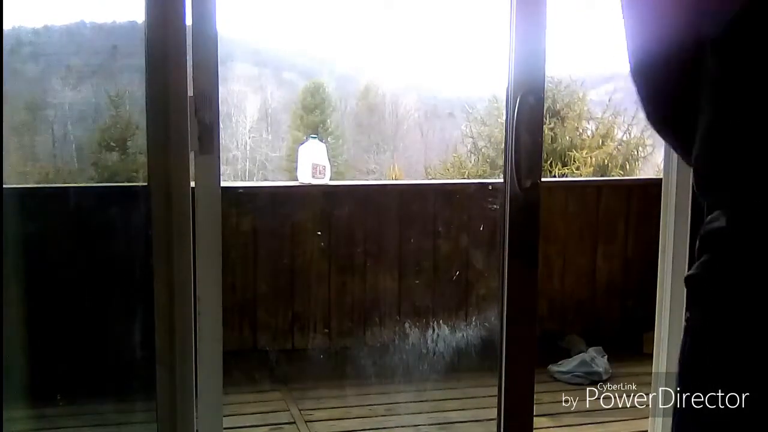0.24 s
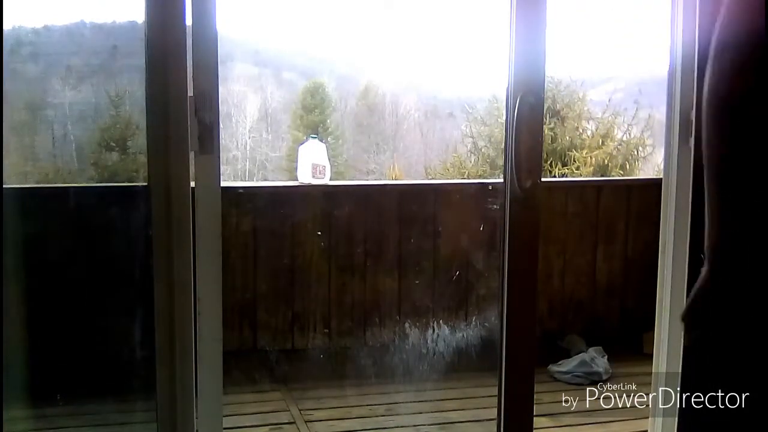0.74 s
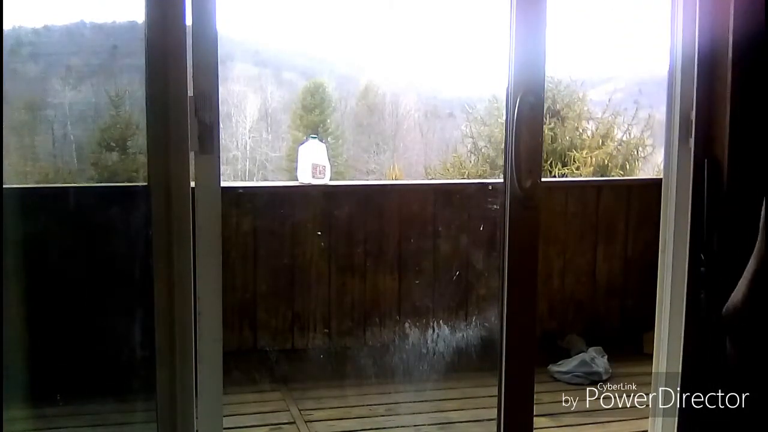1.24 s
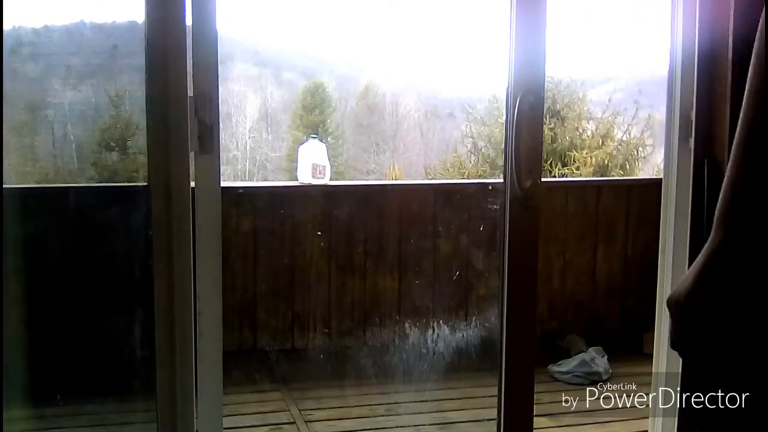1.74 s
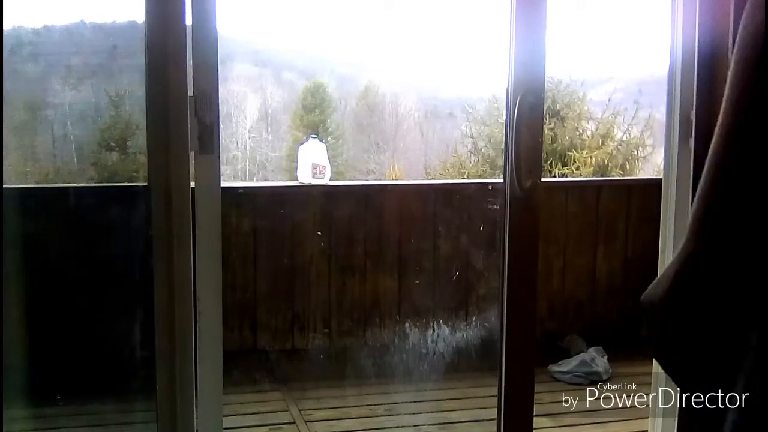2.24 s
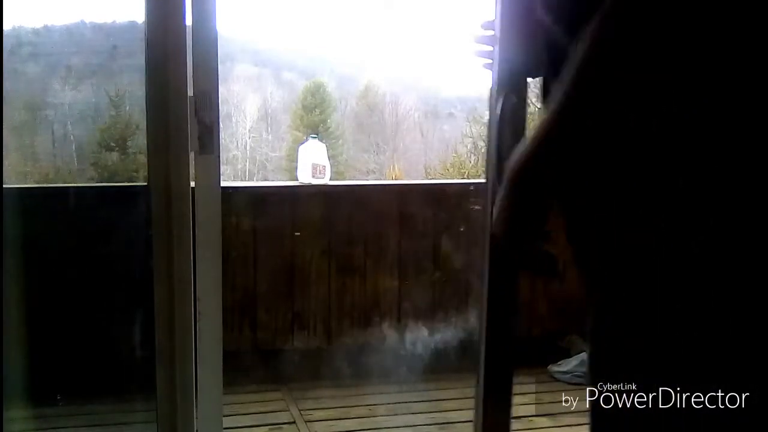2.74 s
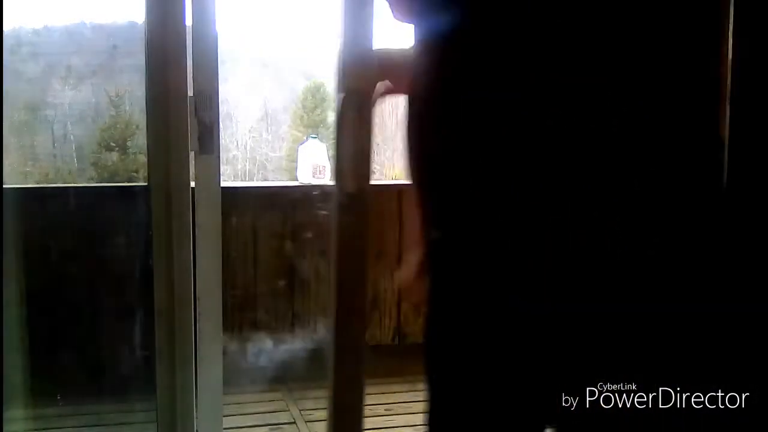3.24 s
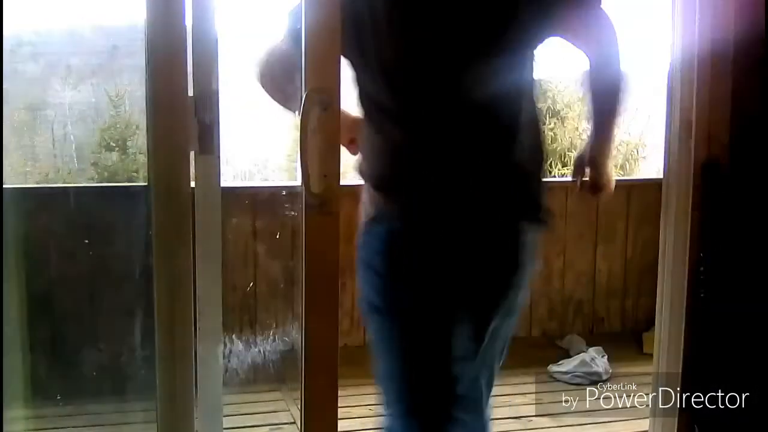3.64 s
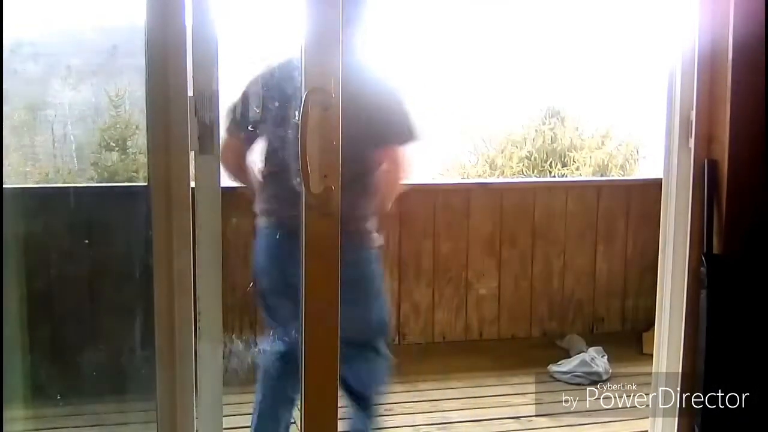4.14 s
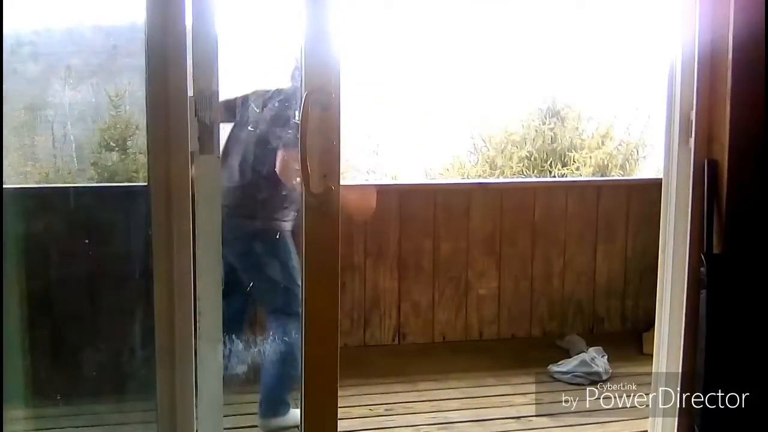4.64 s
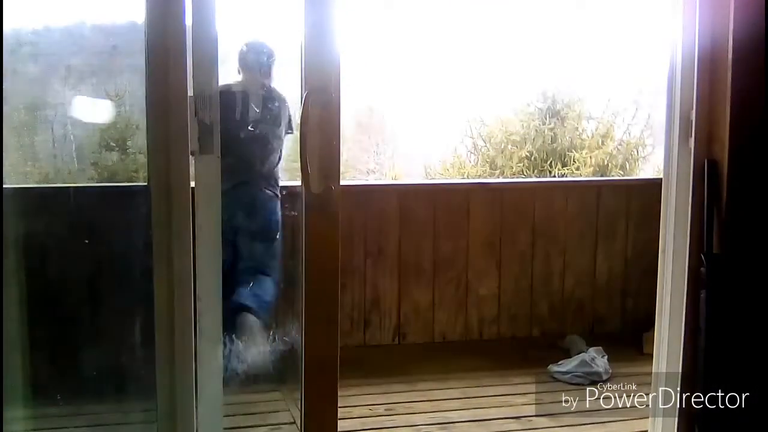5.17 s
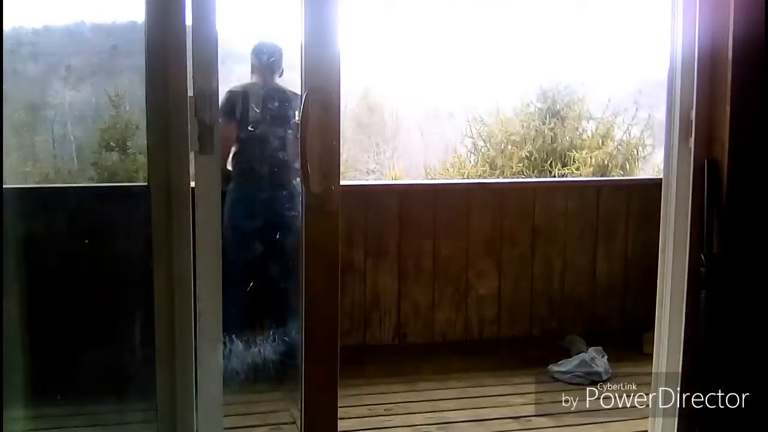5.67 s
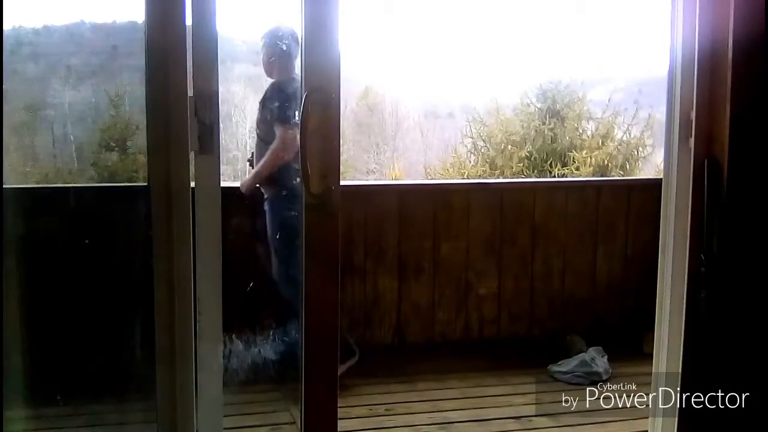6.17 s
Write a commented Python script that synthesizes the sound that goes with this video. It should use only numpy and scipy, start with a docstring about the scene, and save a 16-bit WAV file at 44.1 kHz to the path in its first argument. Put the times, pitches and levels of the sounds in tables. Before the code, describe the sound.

In a quiet wooden room with hum, hiss and a tiny tick each second, soles scuff and a heel booms close by. A board creaks, a glass sliding door snaps off its latch and rumbles open. Softer steps cross the deck outside with cloth rustle and faint squeaks, then one loud knock clatters and rings in the room. The microphone stays indoors.

```python
"""A low hum, hiss and thin whine are heard first, with a small tick of damped sines once a second.
Soles shuffle over a wooden floor (filtered random slips), boards groan and creak, a heel booms (clicks, modes).
A glass sliding door snaps off its latch and rolls open: friction noises that grow with its speed.
Softer steps thud on the deck outside amid cloth rustle and faint squeaks (noise-driven resonances).
Then one loud wooden knock clatters and rings: clicks through a wood colour and a room, plus damped modes."""
import sys
import numpy as np
from scipy import signal
from scipy.io import wavfile
from scipy.ndimage import uniform_filter1d

SR = 44100
rng = np.random.default_rng(int(sys.argv[2]) if len(sys.argv) > 2 else 0)


def unload_wav(signal):
    """Save mono or channel-first audio to the path in sys.argv[1] as 16-bit WAV at rate SR, clipped to [-1, 1]."""
    wavfile.write(
        sys.argv[1],
        SR,
        np.round(np.clip(np.atleast_2d(signal).T, -1, 1) * 32767).astype(np.int16),
    )


N = 282703
TIME = np.arange(N) / SR


def amp(db):
    """Decibels to gain."""
    return 10 ** (np.asarray(db) / 20)


def evened(x):
    """Scale to rms 1."""
    return x / np.sqrt(np.mean(x ** 2) + 1e-20)


def read(points, hz):
    """Straight lines between points on a log-frequency axis."""
    point_hz, value = np.transpose(points)
    return np.interp(np.log(hz + 1), np.log(point_hz + 1), value)


def add(mix, start_s, sound):
    """Mix a sound in at start_s, cut at the end of the mix."""
    part = mix[max(round(start_s * SR), 0):][:len(sound)]
    part += sound[:len(part)]


def envelope(start_s, length_s, attack_s, fade_db_per_s, arch_db=0):
    """Attack, hold and release; the ends of the hold lie arch_db under its middle."""
    t = TIME - start_s
    arch = (2 * np.clip(t / length_s, 0, 1) - 1) ** 2
    fade_db = fade_db_per_s * np.maximum(t - length_s, 0)
    return np.clip(t / attack_s, 0, 1) * amp(-arch_db * arch - fade_db)


def coloured(x, spectrum, size=4096):
    """Minimum-phase filter of unit energy with the given spectrum."""
    hz = abs(np.fft.fftfreq(size, 1 / SR))
    log_gain = np.log(amp(read(spectrum, hz)))
    response = np.exp(np.conj(signal.hilbert(log_gain)))
    taps = np.fft.ifft(response).real[:size // 2]
    return signal.oaconvolve(x, taps / np.linalg.norm(taps))[:len(x)]


# room decay before the ring factor: hz, t60_s
ROOM_DECAY = [(60, 0.29), (200, 0.46), (500, 0.53), (1500, 0.55), (3500, 0.46), (6000, 0.34), (11000, 0.44)]


def room(wet_db, ring=1, size=32768):
    """Direct click plus dense reflections, each band dying at its own speed; unit energy."""
    clicks = rng.choice([-1., 1.], size)
    hz, t, bands = signal.stft(clicks, SR, nperseg=256)
    t60_s = ring * read(ROOM_DECAY, hz)[:, None]
    tail = signal.istft(bands * amp(-60 * t / t60_s), SR, nperseg=256)[1][:size]
    tail *= 1 - np.exp(-TIME[:size] / 0.00041)  # onset, s
    response = amp(wet_db) * tail / np.linalg.norm(tail)
    response[0] += 1
    return response / np.linalg.norm(response)


def ringing(modes, size=32768):
    """Sum of exponentially damped sines."""
    t = TIME[:size]
    return sum(amp(db - 60 * t / t60_s) * np.sin(2 * np.pi * hz * t) for hz, db, t60_s in modes)


def wavering(hz, width_hz):
    """Noise-driven resonance around a pitch; rms 1."""
    lowpass = signal.butter(2, width_hz / 2, fs=SR, output="sos")
    noise = rng.standard_normal(N) + 1j * rng.standard_normal(N)
    drift = signal.sosfilt(lowpass, noise)
    carrier = np.exp(2j * np.pi * np.cumsum(hz * np.ones(N)) / SR)
    return evened((drift * carrier).real)


def singing(hz, waver):
    """Steady tone whose pitch trembles by waver (rms share of hz); rms 1."""
    tremble = evened(uniform_filter1d(rng.standard_normal(N), size=400))
    phase = 2 * np.pi * np.cumsum(hz * (1 + waver * tremble)) / SR
    return np.sqrt(2) * np.sin(phase)


def blows(rows, spectrum, wet_db, ring=1):
    """Clicks through the object's colour and the room; level = energy over 10 ms."""
    out = np.zeros(N)
    for start_s, db in rows:
        add(out, start_s, amp(db) * np.sqrt(SR / 100) * room(wet_db, ring))
    return coloured(out, spectrum)


def body(rows, modes, gain_db):
    """Damped modes that each blow sets ringing."""
    out, ring = np.zeros(N), ringing(modes)
    for start_s, db in rows:
        add(out, start_s, amp(db + gain_db) * ring)
    return out


def friction(spectrum, per_s, spread_db, wet_db, count=3):
    """Random tiny slips, coloured by the surface; reflections shift as the source moves; rms 1."""
    sizes = amp(spread_db * np.minimum(rng.exponential(1, N), 4))
    slips = (rng.random(N) < per_s / SR) * rng.choice([-1., 1.], N) * sizes
    heard = np.zeros(N)
    for k in range(count):
        place = np.maximum(np.cos(2 * np.pi * (2.5 * TIME + k / count)), 0)  # 2.5 rounds per s
        heard += signal.oaconvolve(slips * place, room(wet_db, ring=0.95))[:N]
    return evened(coloured(heard, spectrum))


# hiss colour: hz, rel_db_per_hz
HISS_COLOUR = [(20, -29), (55, -5.5), (90, -7.5), (150, -2.5), (300, -8.5), (650, -15.5), (1450, -20.5),
               (2200, -24), (6700, -26.5), (7900, -38.5), (11500, -39), (13800, -34), (14700, -29),
               (16000, -26)]
# hum resonances: hz, width_hz, level_db
HUM_BANDS = [(117, 8.8, -69.5), (231.6, 10.4, -70.5), (277, 31, -73), (361, 12.6, -75), (469, 14, -75),
             (1476, 28, -79.5)]
HISS_DB, WHINE_DB, WHINE_HZ = -59.5, -68, 12695


def background():
    """Room hum from narrow resonances, microphone hiss from shaped noise, electronic whine from a sine."""
    hiss = amp(HISS_DB) * evened(coloured(rng.standard_normal(N), HISS_COLOUR))
    hum = sum(amp(db) * wavering(hz, width_hz) for hz, width_hz, db in HUM_BANDS)
    whine = amp(WHINE_DB) * np.sin(2 * np.pi * WHINE_HZ * TIME)
    return hiss + hum + whine


# damped parts of one tick: delay_s, hz, level_db, t60_s
TICK_PARTS = [(0, 280, -38, .024), (.002, 750, -46, .014), (.002, 1480, -55, .02), (.01, 120, -41, .055),
              (.01, 450, -50, .012), (.0045, 3000, -56, .035), (.001, 2450, -56, .015)]
TICK_START_S, TICK_PERIOD_S = .0645, 1.0


def ticking():
    """A small mechanism beside the microphone: short damped sines, dry, once a second."""
    out = np.zeros(N)
    for start_s in np.arange(TICK_START_S, TIME[-1], TICK_PERIOD_S):
        for delay_s, hz, db, t60_s in TICK_PARTS:
            add(out, start_s + delay_s, ringing([(hz, db, t60_s)]))
    return out


# faint squeaks: start_s, length_s, pitch_hz, level_db, upper_db
SQUEAK_NOTES = [(3.817, 0.09, 1365, -66, -84), (3.999, 0.026, 1450, -63, -69),
                (4.077, .065, 1484, -66, -79)]
# upper tones: pitch_ratio, db_re_upper
SQUEAK_UPPERS = [(1.77, -0.5), (3.2, -7)]
SQUEAK_ATTACK_S, SQUEAK_FADE_DB_PER_S, SQUEAK_WIDTH_HZ = .01, 190, 30


def squeaks():
    """Short noise-driven resonances, each with two weaker, wider upper tones."""
    out = np.zeros(N)
    for start_s, length_s, hz, db, upper_db in SQUEAK_NOTES:
        tone = amp(db) * wavering(hz, SQUEAK_WIDTH_HZ)
        for ratio, part_db in SQUEAK_UPPERS:
            tone += amp(upper_db + part_db) * wavering(ratio * hz, 2 * SQUEAK_WIDTH_HZ)
        out += envelope(start_s, length_s, SQUEAK_ATTACK_S, SQUEAK_FADE_DB_PER_S) * tone
    return out


# loud slips of floorboards: start_s, rel_db
CREAK_SLIPS = [(.1235, -50), (2.3605, -38), (2.364, -46.5), (2.3725, -43), (2.4005, -42), (2.42, -44),
               (2.4675, -41), (2.4995, -41.5), (2.5175, -42.5), (2.5345, -41.5), (2.56, -40.5),
               (2.564, -45)]
# board colour: hz, rel_db
BOARD_COLOUR = [(60, -50), (110, -21), (230, 1.5), (340, -3.5), (520, -1), (760, -5), (900, -2.5),
                (1200, -5.5), (1600, -8.5), (2050, -21), (2700, -20), (3900, -19.5), (4700, -29),
                (6900, -30), (8000, -50), (15000, -45)]
LOAD_START_S, LOAD_LENGTH_S, LOAD_ATTACK_S, LOAD_FADE_DB_PER_S = 2.358, 0.2, 0.02, 132
FINE_CREAK_DB = -52.5


def creak():
    """A loaded board sticks and slips: cracks ring briefly in wood and room, over a bed of fine slips."""
    load = envelope(LOAD_START_S, LOAD_LENGTH_S, LOAD_ATTACK_S, LOAD_FADE_DB_PER_S)
    fine = amp(FINE_CREAK_DB) * load * friction(BOARD_COLOUR, per_s=600, spread_db=4.0, wet_db=6.0)
    cracks = amp(-4) * blows(CREAK_SLIPS, BOARD_COLOUR, wet_db=-0.5, ring=0.03)
    echo = amp(-5.5) * blows(CREAK_SLIPS, BOARD_COLOUR, wet_db=19, ring=0.58)
    return fine + cracks + echo


# sliding strokes of the feet: start_s, length_s, rub_db, hiss_db
SHUFFLE_STROKES = [(0.108, 0.14, -45, -59), (0.613, 0.27, -45.5, -53)]
# rubbing colour, one list per stroke: hz, rel_db
RUB_COLOURS = [
    [(53, -52), (90, -24), (146, 1.5), (189, -9.5), (425, -0.5), (537, -13), (757, -10), (833, -17),
     (1050, -13), (2400, -25.5), (3120, -52), (5280, -120)],
    [(71, -45), (120, -15), (271, -15), (315, -20), (431, -2), (668, -14.5), (767, -12), (973, -17),
     (1270, -10.5), (2250, -28.5), (2400, -44), (3120, -60), (5280, -120)],
]
# sole hiss colour: hz, rel_db
SOLE_COLOUR = [(1200, -37), (2300, -3.5), (2900, 1), (3300, -2), (4000, 2.5), (4600, -6), (5700, -10),
               (6800, -11.5), (8000, -30.5), (15000, -24)]
SHUFFLE_ATTACK_S, SHUFFLE_FADE_DB_PER_S = 0.0076, 150
RUB_ARCH_DB, HISS_ARCH_DB = 6, 9  # the hiss swells more
# board singing under the sliding weight: start_s, length_s, pitch_hz, level_db
BOARD_GROANS = [(0.0, 0.0087, 422, -47.5), (.69, 0.056, 450, -53.5), (0.791, .055, 430, -49)]
GROAN_ATTACK_S, GROAN_FADE_DB_PER_S, GROAN_WAVER = 0.0027, 498, .015  # waver: share of pitch
# heel taps, then a late creak of the floor: start_s, level_db
HEEL_TAPS = [(1.403, -31), (1.413, -35.5), (1.546, -47.5)]
# floor colour under the heel: hz, rel_db
FLOOR_COLOUR = [(30, -48), (60, -3), (100, -2.5), (200, -1), (300, -2.5), (450, -5), (750, -10.5),
                (1000, -16), (1650, -16), (2100, -32.5), (4000, -25.5), (7000, -43), (8500, -68),
                (15000, -54)]
# weight landing on the joists: start_s, rel_db
WEIGHT_DROPS = [(.085, -48), (.152, -46), (1.406, -29), (1.412, -24.5), (1.474, -36), (1.518, -45.5)]
# joist modes: hz, rel_db, t60_s
JOIST_MODES = [(120, -19.5, 0.24), (166, 7, 0.058), (229.4, -5, 0.25)]
# boom colour: hz, rel_db
BOOM_COLOUR = [(30, -65), (65, -25), (95, 8.5), (125, 3), (175, 2), (250, -5), (330, -24), (700, -55)]


def indoor_steps():
    """Two sliding strokes rub and hiss, a board sings, and a heavy heel makes the floor boom."""
    out = np.zeros(N)
    for (start_s, length_s, rub_db, hiss_db), colour in zip(SHUFFLE_STROKES, RUB_COLOURS):
        stroke = envelope(start_s, length_s, SHUFFLE_ATTACK_S, SHUFFLE_FADE_DB_PER_S, RUB_ARCH_DB)
        out += amp(rub_db) * stroke * friction(colour, per_s=1800, spread_db=1.5, wet_db=0.5)
        swell = envelope(start_s, length_s, SHUFFLE_ATTACK_S, SHUFFLE_FADE_DB_PER_S, HISS_ARCH_DB)
        out += amp(hiss_db) * swell * friction(SOLE_COLOUR, per_s=2900, spread_db=3.0, wet_db=-2.0)
    for start_s, length_s, hz, db in BOARD_GROANS:
        press = envelope(start_s, length_s, GROAN_ATTACK_S, GROAN_FADE_DB_PER_S)
        out += amp(db) * press * singing(hz, GROAN_WAVER)
    joists = body(WEIGHT_DROPS, JOIST_MODES, gain_db=-2.0)
    highpass = signal.butter(2, 85, "high", fs=SR, output="sos")  # the joists' boom is cut below about 85 Hz
    joists = signal.sosfilt(highpass, joists)
    boom = amp(-3.0) * blows(WEIGHT_DROPS, BOOM_COLOUR, wet_db=3, ring=0.92)
    heel = blows(HEEL_TAPS, FLOOR_COLOUR, wet_db=2.5, ring=0.82)
    return out + heel + joists + boom


# footfalls on sill and deck: start_s, heel_db, sole_delay_s, sole_db, rub_db, rub_length_s
FOOTFALLS = [(3.079, -45, 0.055, -61, -50, 0.054), (3.882, -38.5, .068, -50, -56, 0.077),
             (4.012, -48, 0.055, -52, -57, 0.059), (4.225, -44, 0.1, -46, -58, .2),
             (4.484, -50, .055, -45, -54.5, 0.099), (4.812, -43.5, 0.052, -43.5, -58, 0.075),
             (5.629, -49.5, 0.063, -55, -66, .06)]
# deck colour: hz, rel_db
DECK_COLOUR = [(24, -27), (40, -18), (59, 12), (80, 2.5), (200, 1.5), (247, 2), (413, -13.5), (671, -16.5),
               (1180, -37), (1500, -27), (1950, -34), (3300, -120)]
# plank modes: hz, rel_db, t60_s
PLANK_MODES = [(59.2, -1, 0.71), (125, 0, 0.2), (232, -9, 0.22)]
RUB_ATTACK_S, RUB_FADE_DB_PER_S = .01, 172
# trouser legs brushing: start_s, length_s, rel_db
LEG_SWISHES = [(3.749, 0.083, -58), (3.933, .03, -63), (4.175, 0.03, -66)]
SWISH_ATTACK_S, SWISH_FADE_DB_PER_S = 0.019, 142
# rustle colour: hz, rel_db
CLOTH_COLOUR = [(100, -20), (300, 7.5), (600, -3.5), (1000, -9.5), (2000, -23.5), (4000, -20), (7000, -32),
                (9000, -42)]
# bright grit colour, shared by cloth and door track: hz, rel_db
GRIT_COLOUR = [(1200, -13), (2200, -2.5), (2800, -0.5), (4000, -0.5), (5000, -15), (6700, -13.5),
               (8000, -35), (11000, -30), (13000, -18), (15000, -7)]


def deck_steps():
    """Heel and sole thud on springy planks and rub a little; trouser legs brush as they swing."""
    contacts, rubbing, swinging = [], np.zeros(N), np.zeros(N)
    for start_s, heel_db, delay_s, sole_db, rub_db, length_s in FOOTFALLS:
        contacts += [(start_s, heel_db), (start_s + delay_s, sole_db)]
        rubbing += amp(rub_db) * envelope(start_s, length_s, RUB_ATTACK_S, RUB_FADE_DB_PER_S)
    for start_s, length_s, db in LEG_SWISHES:
        swinging += amp(db) * envelope(start_s, length_s, SWISH_ATTACK_S, SWISH_FADE_DB_PER_S)
    thuds = blows(contacts, DECK_COLOUR, wet_db=8.5, ring=0.99)
    planks = body(contacts, PLANK_MODES, gain_db=-11)
    rustle = rubbing + amp(0.5) * swinging
    rustle *= friction(CLOTH_COLOUR, per_s=1400, spread_db=3.5, wet_db=-0.5)
    cloth = amp(-2.5) * swinging * friction(GRIT_COLOUR, per_s=2500, spread_db=3.0, wet_db=-6)
    return thuds + planks + rustle + cloth


# knock, clatter and rebound: start_s, level_db
KNOCK_BLOWS = [(5.1349, -16), (5.1431, -19), (5.152, -20), (5.1607, -21), (5.1991, -25.5), (5.231, -49)]
# knock colour: hz, rel_db
KNOCK_SPECTRUM = [(25, -46), (55, -3.5), (110, -7), (220, -14), (340, 2), (470, 4), (600, -8.5),
                  (800, -3.5), (1100, -6), (1600, -4.5), (2300, -11.5), (3800, -9.5), (4900, -21),
                  (6700, -23), (8100, -44.5), (13500, -42.5), (15000, -35)]
# woodwork modes: hz, rel_db, t60_s
WOODWORK_MODES = [(327, -12.5, 0.71), (338.4, -2.5, 0.39), (346, -4, 0.39), (405.5, -1, 0.37),
                  (422, -7, 0.22), (456, -3, 0.46), (495, -8, 0.54), (485, -11, 0.22), (677, -7, 0.27),
                  (689, -2.5, 0.25), (787, -2.5, 0.3), (816, -9.5, 0.5), (902, -8.5, 0.56),
                  (940, -20, 0.42), (1004, -8.5, 0.45), (1130, -15, 0.53), (1250, -14, 0.42),
                  (1310, -17, 0.26), (1576, -16, 0.63), (1630, -16, 0.31), (2134, -12, 0.44),
                  (2586, -13, 0.38), (2640, -23, .28), (3096, -8.5, 0.28), (3630, -9, 0.15)]
WOOD_DB = -23.5


def knock():
    """A hard blow clatters for some 25 ms and leaves the woodwork ringing in damped modes."""
    wood = np.zeros(N)
    for mode in WOODWORK_MODES:  # each caught at another moment of the clatter
        start_s = rng.uniform(KNOCK_BLOWS[0][0], KNOCK_BLOWS[2][0])
        add(wood, start_s, ringing([mode]))
    return blows(KNOCK_BLOWS, KNOCK_SPECTRUM, wet_db=20, ring=0.84) + amp(WOOD_DB) * wood


# door breaking free of its latch: start_s, level_db
LATCH_BLOWS = [(2.753, -28.5), (2.7585, -32), (2.766, -35.5), (2.7705, -34.5), (2.7975, -62)]
# latch colour: hz, rel_db
LATCH_SPECTRUM = [(47, -52), (80, -7), (211, -0.5), (306, -5), (382, 1), (567, -12), (789, -7.5),
                  (1150, -17.5), (1460, -14.5), (2370, -18), (3230, -25.5), (3770, -16.5), (5600, -19),
                  (8690, -49), (15400, -36)]
# glass pane modes: hz, rel_db, t60_s
GLASS_MODES = [(115.5, -1.5, 0.55), (214, 4, 0.43), (262, 1, 0.53), (351.5, -3, 0.47), (404, -11, 0.39),
               (800, 3, 0.063), (2300, -1, 0.15)]
# steel catch modes: hz, rel_db, t60_s
STEEL_MODES = [(4180, -14, .2), (4660, -3, 0.12), (5500, 0, 0.071), (5809, -25, 0.082)]
# door pushed open, coasting to rest: time_s, share_of_top_speed
SPEED_CURVE = [(2.78, 0.24), (2.92, 0.46), (3.02, 0.89), (3.27, 0.98), (3.44, 0.62), (3.58, 0.31),
               (3.72, 0.099), (3.86, .02)]
# low rolling colour: hz, rel_db
RUMBLE_COLOUR = [(30, -17), (60, -13), (115, -8), (150, -3.5), (200, 2), (270, 3.5), (330, -2), (440, -2.5),
                 (520, -11), (900, -62.5)]
# middle rolling colour: hz, rel_db
ROAR_COLOUR = [(250, -16), (480, -1), (570, 3), (720, 0), (800, -5), (1000, -7.5), (1200, -12),
               (1400, -12.5), (1750, -18), (2300, -28.5), (4000, -66)]
# level at top speed, power of speed
RUMBLE_DB, RUMBLE_POWER = -36.5, 1.11
ROAR_DB, ROAR_POWER = -37, 1.6
GRIT_DB, GRIT_POWER = -56, .9
# rollers over track joints: start_s, level_db
TRACK_BUMPS = [(3.004, -44), (3.238, -39), (3.54, -43.5)]
# ticks of metal fittings: start_s, level_db
FITTING_TICKS = [(2.747, -39), (2.972, -56), (3.009, -50), (3.54, -62), (3.879, -56)]
# metal colour: hz, rel_db
METAL_COLOUR = [(300, -25), (1500, 5.5), (4000, 2), (6300, 1.5), (8000, -24), (15000, -6)]


def door():
    """The latch snaps and rings catch and pane; rollers rumble, roar and grind, louder with speed."""
    latch = blows(LATCH_BLOWS, LATCH_SPECTRUM, wet_db=11, ring=0.9)
    pane = body(LATCH_BLOWS[2:3], GLASS_MODES, gain_db=-3)
    catch = body(LATCH_BLOWS[:1], STEEL_MODES, gain_db=-8.5)
    speed = np.maximum(np.interp(TIME, *np.transpose(SPEED_CURVE), left=0, right=0), 0)
    rumble = friction(RUMBLE_COLOUR, per_s=2500, spread_db=0.7, wet_db=5)
    roar = friction(ROAR_COLOUR, per_s=2000, spread_db=0.0, wet_db=1.0)
    grit = friction(GRIT_COLOUR, per_s=2800, spread_db=-1.0, wet_db=-3.5)
    rolling = amp(RUMBLE_DB) * speed ** RUMBLE_POWER * rumble
    rolling += amp(ROAR_DB) * speed ** ROAR_POWER * roar
    rolling += amp(GRIT_DB) * speed ** GRIT_POWER * grit
    bumps = blows(TRACK_BUMPS, ROAR_COLOUR, wet_db=-2, ring=0.6)
    rattles = blows(FITTING_TICKS, METAL_COLOUR, wet_db=24, ring=0.31)
    return latch + pane + catch + rolling + bumps + rattles


def scene():
    """All sources at one microphone."""
    still = background() + ticking()
    steps = squeaks() + creak() + indoor_steps() + deck_steps()
    return (still + steps + knock() + door())[None]


EDGE_HZ = 15550


def record(dry):
    """The recorder's band limit: a linear-phase lowpass."""
    lowpass = signal.firwin(511, EDGE_HZ, window=("kaiser", 9), fs=SR)
    return signal.oaconvolve(dry, lowpass[None], "same")


dry = scene()
out = record(dry)
unload_wav(out)
```